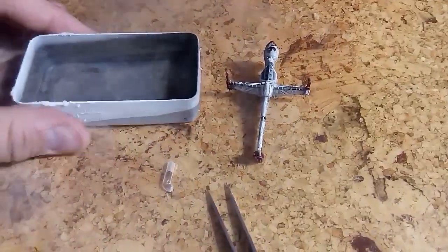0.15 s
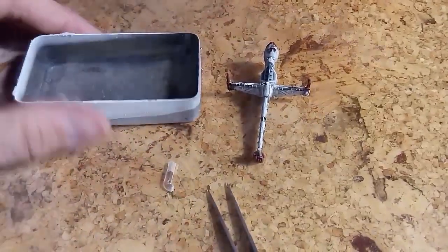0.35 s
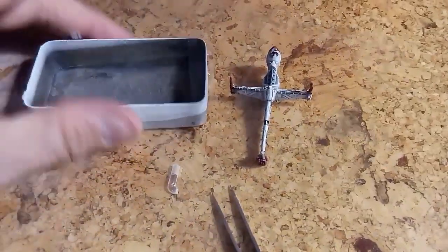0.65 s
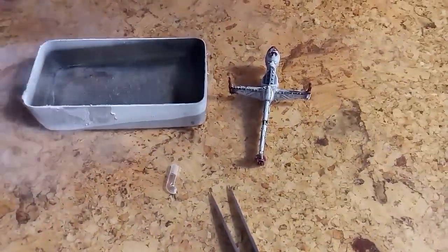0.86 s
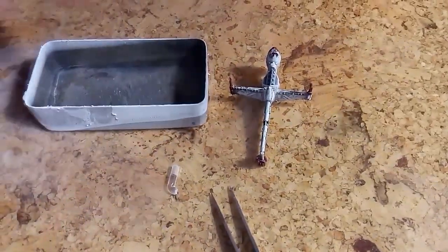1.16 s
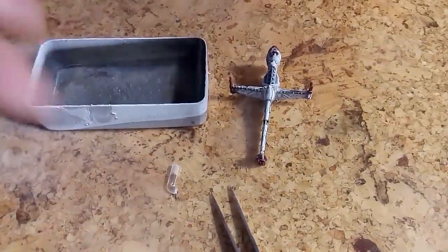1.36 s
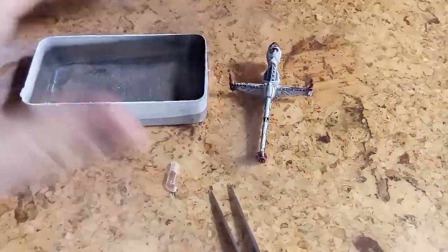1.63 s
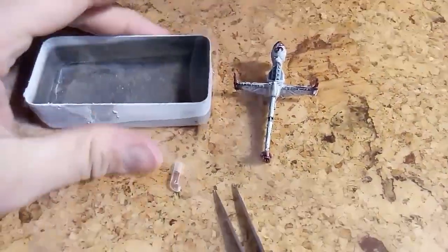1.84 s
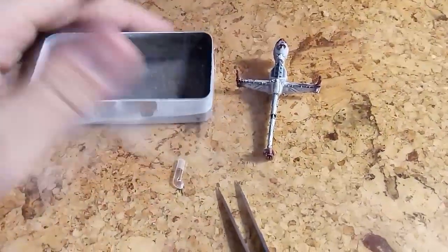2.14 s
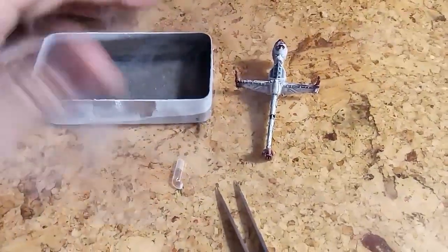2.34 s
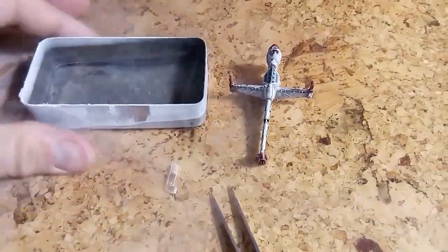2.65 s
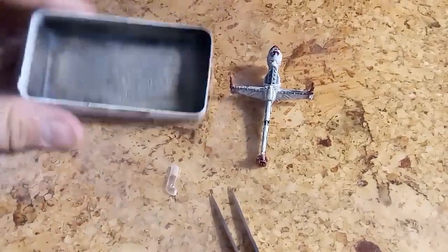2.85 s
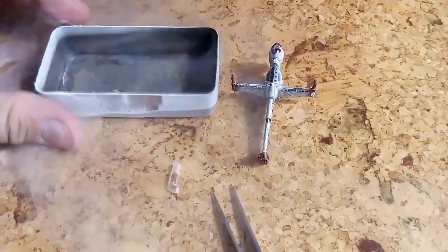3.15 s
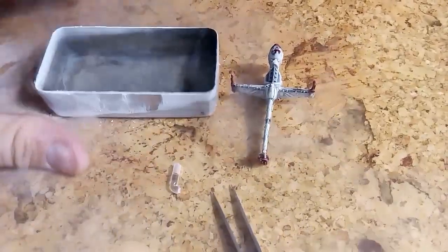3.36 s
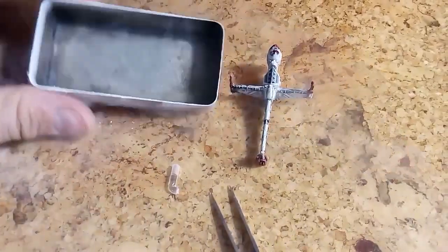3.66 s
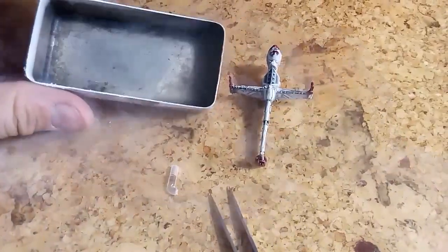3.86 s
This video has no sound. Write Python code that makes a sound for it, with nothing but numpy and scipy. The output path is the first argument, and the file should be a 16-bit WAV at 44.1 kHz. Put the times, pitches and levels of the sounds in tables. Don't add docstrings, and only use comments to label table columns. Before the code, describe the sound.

Liquid nitrogen boils with a grainy, airy fizz, strongest at the start, thinning toward 1.8 seconds, then rising brightly to the end at 4. Sharp frost ticks and short spits pepper it. The metal tray knocks the table early, at 0.8, 2.0 and 2.2, scrapes near 3.1, then drops hardest at 3.2 with a ringing clank and smaller taps. Close microphone, faint room murmur.

```python
import sys
import numpy as np
from scipy import signal
from scipy.fft import rfft, irfft
from scipy.io import wavfile

SR = 44100
rng = np.random.default_rng(int(sys.argv[2]) if len(sys.argv) > 2 else 0)


def elevation(decibels):
    levels = np.asarray(decibels, float)
    return 10 ** (levels / 20)


def inscribe(sig):
    pcm = np.round(np.clip(np.atleast_2d(sig).T, -1, 1) * 32767)
    wavfile.write(sys.argv[1], SR, pcm.astype(np.int16))


N = 176400
T = np.arange(N) / SR


def rms_one(x):
    return x / np.sqrt(np.mean(x ** 2) + 1e-20)


def in_time(rows):
    s, *columns = np.transpose(rows)
    return [np.interp(T, s, column) for column in columns]


def colour(x, points):
    hz, db = np.transpose(points)
    bins_hz = np.fft.rfftfreq(N, 1 / SR) + 1
    gain_db = np.interp(np.log(bins_hz), np.log(hz), db)
    return irfft(rfft(x) * elevation(gain_db), N)


def band(x, low_hz, high_hz):
    return signal.sosfilt(signal.butter(2, [low_hz, high_hz], "band", fs=SR, output="sos"), x)


def drift(rate_hz):
    r = np.exp(-80 * np.pi * rate_hz / SR)
    noise = rng.standard_normal(N // 40 + 2002)
    slow = signal.lfilter([1], [1, -2 * r, r * r], noise)[2000:]
    return np.interp(np.arange(N) / 40, np.arange(len(slow)), rms_one(slow))


def ring(x, hz, t60_s):
    r, w = elevation(-60 / (t60_s * SR)), 2 * np.pi * hz / SR
    return signal.lfilter([0, np.sin(w)], [1, -2 * r * np.cos(w), r * r], x + 1e-18)


def patchy(x, patchy_db, edges_hz):
    out, sign = 0, 1
    for low_hz, high_hz in zip(edges_hz, edges_hz[1:]):
        flicker_db = patchy_db * (drift(0.88) + 1.1 * drift(13.4))
        out = out + sign * elevation(flicker_db) * band(x, low_hz, high_hz)
        sign = -sign
    return out


def decay(s, db, t60_s, cut_s, rise_s):
    t = T - s
    rise = np.clip(t / rise_s, 0, 1)
    cut = np.clip((cut_s - t) / .035 + 1, 0, 1)
    return elevation(db - 60 * np.maximum(t, 0) / t60_s) * rise * cut


def swell(s, length_s, lean=1):
    return np.sin(np.pi * np.clip((T - s) / length_s, 0, 1) ** lean) ** .8


def fizz_source(extra_db):
    grains_per_s, grain_db, spread_db = 3000, 3, 3
    sizes = elevation(spread_db * np.minimum(rng.exponential(1, N), 5)) * rng.choice([-1, 1], N)
    born = rng.random(N) < grains_per_s * elevation(3 * drift(20)) / SR
    return rng.standard_normal(N) + elevation(grain_db + extra_db) * rms_one(sizes * born)


def whistles(x):
    pitches_hz = np.geomspace(1200, 7000, 26) * rng.uniform(.97, 1.03, 26)
    sung = sum(elevation(5.5 * drift(9.4)) * ring(x, hz, t60_s=.04) for hz in pitches_hz)
    return elevation(-8) * np.std(x) * rms_one(sung)


# time_s, fizz_level_db, lower_swell_db, hollow_db, sizzle_db
BOIL_VIGOUR = [(0.0, -41, -2.5, -3, 8), (.23, -46.5, 3, -2, 2.5), (.66, -47, 2, -1, 1),
               (.85, -49, 3.5, -6, -0.5), (1.17, -51, -0.5, -5, 1), (1.5, -51.5, 1.5, -9, 2),
               (1.77, -54.5, -1, -11, 0), (1.92, -51.5, -8, -4, 2), (2.05, -48, 1, -1, 2.5),
               (2.3, -50, 2, -6.5, 0.5), (2.6, -48.5, 2.5, -3, 1.5), (2.87, -49, 5, -2, 2.5),
               (3.1, -46, 1.5, -1.5, 4), (3.4, -43.5, -0.5, -4.5, 2), (3.6, -42, 1, -5.5, 3),
               (3.8, -39, -7, -2.5, 5), (4.0, -38, -18, -7, 6.5)]
# freq_hz, level_per_hz_db
FIZZ_COLOUR = [(500, -46), (900, -68), (1300, -7.5), (1800, -13), (4100, -4.5), (6500, 0.5), (9000, -5),
               (16000, -16)]


def boil():
    level_db, lower_db, hollow_db, sizzle_db = in_time(BOIL_VIGOUR)
    x = colour(fizz_source(extra_db=-6.5), FIZZ_COLOUR)
    low = patchy(x, 2.5, np.geomspace(500, 3200, 11))
    mid = patchy(x, 2, [3200, 3800, 4500])
    high = patchy(x, 1.8, np.geomspace(4500, 8000, 6))
    high = high - elevation(sizzle_db) * patchy(x, 1.8, np.geomspace(8000, 19000, 5))
    fizz = high + elevation(hollow_db) * mid + elevation(lower_db) * low + whistles(x)
    return elevation(level_db + 1.0 * drift(10.0)) * fizz / np.std(high)


# freq_hz, level_per_hz_db
AIR_COLOUR = [(12, -39), (24, -4), (181, 3), (572, -9), (775, -3), (1110, -12.5), (2000, -11.5), (2170, -1),
              (2500, -22.5), (3250, -43), (5500, -120)]
# time_s, level_db
AIR_LEVEL = [(0.0, -58), (1.57, -64), (4.0, -60.5)]


def room_tone():
    level_db, = in_time(AIR_LEVEL)
    x = patchy(colour(rng.standard_normal(N), AIR_COLOUR), 2.5, np.geomspace(15, 4000, 14))
    return elevation(level_db) * x / np.std(band(x, 37, 178))


def sung_noise(rows):
    noise, out = rng.standard_normal(N), 0
    for s, length_s, hz, width_hz, db in rows:
        out = out + swell(s, length_s) * elevation(db) * rms_one(ring(noise, hz, 2.2 / width_hz))
    return out


# start_s, length_s, pitch_hz, width_hz, level_db
DRONES = [(-.1, .57, 128, 6, -53), (1.68, .38, 2200, 50, -63), (1.85, .36, 700, 30, -66),
          (2.4, 1.7, 195, 10, -64), (1.836, .018, 3700, 100, -50), (2.165, .03, 3700, 150, -52),
          (3.78, .24, 68, 25, -60), (1.425, .17, 323, 25, -61), (2.36, .4, 335, 20, -56),
          (2.34, .14, 450, 200, -57), (.68, .07, 4400, 150, -55)]


def drones():
    return sung_noise(DRONES)


# start_s, length_s, level_db, brightness_db, body_db
SPITS = [
    (0.1306, 0.039, -31, -23, -5.5),
    (0.686, 0.1, -44.5, -5, -10),
    (1.11, 0.069, -52.5, 15.5, -20),
    (1.924, 0.18, -43, -21, -10.5),
    (1.427, .015, -37, 9, -42),
    (1.44, .018, -42.5, 5, -35),
    (3.5, .015, -41, -3, -13),
    (2.163, 0.05, -36, -18, -13),
    (2.913, 0.15, -39.5, -2, -11),
    (3.213, 0.17, -32.5, -26, -9),
]


def spits():
    x = fizz_source(extra_db=4.5)
    core, top = rms_one(band(x, 2400, 10100)), rms_one(band(x, 6770, 11900))
    core = band(band(core, 3800, 12000), 3300, 14000)
    body = rms_one(band(x, 1100, 3500))
    out = 0
    for s, length_s, db, bright_db, body_db in SPITS:
        gust = core + elevation(body_db) * body + elevation(bright_db) * top
        out = out + swell(s, length_s, lean=0.73) * elevation(db) * gust
    return out


# start_s, thump_db, clang_db, crack_db, tail_cut_s
KNOCKS = [(.14, -37, -34.5, -30.5, 0.039), (.428, -41.5, -41, -43, 0.067), (.454, -40, -59, -68, 0.051),
          (.53, -38.5, -60, -58, 0.17), (0.789, -28.5, -33, -35, 0.29), (1.691, -39.5, -45.5, -67, 0.022),
          (1.977, -35, -42, -32, 0.048), (2.185, -21.5, -25, -30.5, 0.18), (2.781, -37, -51, -44, 0.035),
          (3.2092, -52, -44, -40, .004), (3.2133, -18, -14, -9, .38), (3.246, -29, -34, -45, .05),
          (3.438, -41, -52, -57, 0.024), (.881, -40, -55, -60, 0.045), (.969, -48, -51, -60, .05),
          (3.381, -52, -43, -52, 0.12), (3.498, -37.5, -59, -52, 0.012), (3.555, -41, -45.5, -46, 0.045)]
# start_s, length_s, thump_db, clang_db
SLIDES = [
    (2.005, 0.066, -52.5, -58),
    (3.2, 0.034, -59, -48),
    (2.956, 0.027, -52, -44),
    (3.078, 0.1, -49.5, -51),
    (3.681, 0.1, -68, -54),
    (3.753, 0.077, -57.5, -61),
    (3.225, 0.062, -40, -36.5),
    (0.66, .12, -53.5, -62.5),
]


def struck_body(modes, t60_s, rattle_db, broad_db, low_hz, high_hz, rise_s, axis):
    feed, push = 0, 0
    for knock in KNOCKS:
        s, db, cut_s = knock[0], knock[axis], knock[4]
        feed = feed + decay(s, db + rattle_db, t60_s, cut_s, rise_s)
        push = push + decay(s, db - 3.5, 0.014, cut_s, .5 * rise_s)
    slides = sum(decay(k[0], k[axis + 1], 1.2, k[1], .004) for k in SLIDES)
    feed = feed + slides
    noise = rng.standard_normal(N) * elevation(3.9 * drift(65))
    out = (elevation(broad_db) * (feed - 0.39 * slides) + push) * rms_one(band(noise, low_hz, high_hz))
    at = [int(k[0] * SR) for k in KNOCKS]
    for hz, db, mode_t60_s in modes:
        clicks = np.zeros(N)
        clicks[at] = elevation(np.array(KNOCKS)[:, axis] + rng.normal(0, 1.3, len(at)) - 8.5)
        phase = 2 * np.pi * hz * T + 0.5 / mode_t60_s * drift(16.1)
        kept = elevation(3.5 * drift(18.0)) * np.sin(phase)
        out += elevation(db) * (ring(clicks, hz, 0.34 * mode_t60_s) + feed * kept)
    return out


# pitch_hz, level_db, t60_s
THUMP_MODES = [(108, -11, .4), (205, -12, .25), (262, -6, .35), (323, 1, .6), (375, -10, .2),
               (435, -8, .25), (608, -16, .25), (773, -16, .3)]


def thump():
    return struck_body(THUMP_MODES, t60_s=0.76, rattle_db=-9, broad_db=-2.5,
                       low_hz=161.5, high_hz=552, rise_s=0.0072, axis=1)


# pitch_hz, level_db, t60_s
CLANG_MODES = [(1040, -12, .15), (1170, -8, .2), (1300, -11, .15), (1367, 0, .5), (1443, -12, .3),
               (1518, -9, .2), (1828, -6, .3), (2005, -8, .2), (2300, -12, .1)]


def clang():
    return struck_body(CLANG_MODES, t60_s=0.53, rattle_db=-18.5, broad_db=0.5,
                       low_hz=550, high_hz=2680, rise_s=0.00076, axis=2)


def cracks():
    edge = 0
    for s, _, _, db, cut_s in KNOCKS:
        softer = elevation(-.7 * (db + 8))
        edge = edge + decay(s, db + 3.0, 0.017 * softer ** 0.26, cut_s, 0.00044 * softer)
        edge = edge + decay(s, db - 21, 0.35, cut_s, 0.0012)
    return edge * rms_one(band(rng.standard_normal(N), 960, 8900))


# start_s, peak_db, pitch_hz, lower_ring_db
TICKS = [(0.2614, -37, 6480, -8), (0.2947, -32, 5630, -18), (0.348, -33, 6400, -21), (0.38, -36, 6500, -16),
         (0.4274, -23, 5360, -10.5), (0.4594, -34, 6020, -18), (0.5057, -25.5, 6000, -11),
         (0.5585, -33, 5110, -13), (0.603, -30, 5500, -11), (0.7895, -27.5, 5630, -20),
         (0.835, -29.5, 5370, -24), (0.9038, -36, 6180, -17), (0.9243, -32.5, 5520, -29),
         (0.9443, -38, 6060, -20), (1.0258, -33, 5270, -18), (1.053, -38, 6230, -12),
         (1.129, -32, 6340, -25), (1.1654, -34.5, 6160, -23), (1.242, -39, 6100, -24),
         (1.3733, -43, 6640, -20), (1.4007, -35.5, 6130, -20), (1.4344, -28, 5760, -31),
         (1.498, -38, 4740, -22), (1.583, -40, 6100, -17), (1.908, -31.5, 5700, -32),
         (1.9274, -25.5, 6300, -26), (1.9754, -32, 5180, -26), (2.0088, -29, 6430, -18),
         (2.1026, -31, 6320, -21), (2.1876, -17, 6500, -22), (2.2657, -35, 6580, -14),
         (2.3077, -40, 5420, -16), (2.453, -32.5, 6180, -18), (2.6584, -36, 6100, -16),
         (2.9204, -37, 5980, -15), (2.945, -30, 6100, -17), (3.4471, -28, 5950, -14),
         (3.672, -35, 6260, -24), (3.8425, -26.5, 6760, -17), (3.9724, -23.5, 6080, -22)]


def ticks():
    t60_s, trim_db, lag_s, lower_hz = .007, -2, .001, 2900
    t = np.arange(600) / SR
    out = np.zeros(N)
    for s, db, hz, lower_db in TICKS:
        tone = np.sin(2 * np.pi * hz * t)
        lower = elevation(lower_db + 10.5) * np.sin(2 * np.pi * lower_hz * t)
        click = 0.9 * band(rng.standard_normal(600), 3600, 8400)
        envelope = elevation(-60 * t / t60_s) * np.minimum(t / 0.00014, 1)
        i = int((s + lag_s) * SR)
        out[i:i + 600] += elevation(db + trim_db) * envelope * (tone + lower + click)
    return out


# start_s, length_s, pitch_hz, width_hz, level_db
DRAGS = [(3.072, .05, 594, 28, -47), (3.09, 0.059, 760, 44, -52), (3.074, .07, 1180, 27, -52),
         (3.074, 0.059, 1400, 25, -48), (3.14, .055, 1400, 27, -51.5), (3.08, .12, 1850, 22, -54),
         (3.09, .1, 312, 40, -48.5), (2.9, 0.09, 1370, 36, -46), (.42, .13, 1370, 31, -55.5),
         (1.425, 0.074, 88, 40, -56), (3.1, .05, 690, 73, -54), (3.213, .085, 1367, 15, -33),
         (1.023, .16, 297, 110, -54.5), (3.73, 0.097, 630, 150, -58)]


def drags():
    return sung_noise(DRAGS)


def scene():
    gas = boil() + spits() + ticks()
    tray = thump() + clang() + cracks() + drags()
    return (gas + tray + room_tone() + drones())[None]


def limiter_duck():
    start_s, length_s, depth_db, ramp_s = 3.2005, 0.0076, -15, 0.0018
    inside_s = np.minimum(T - start_s, start_s + length_s - T)
    return elevation(depth_db * np.clip(inside_s / ramp_s, 0, 1))


# freq_hz, level_per_hz_db
MICROPHONE_TOP = [(55, -10), (95, -5.5), (7000, 1), (7750, -14), (9000, -25.5), (13500, -33.5), (15300, -9),
                  (15700, -8), (15880, -40)]


def microphone_colour(x):
    x = colour(x, MICROPHONE_TOP)
    return signal.sosfilt(signal.cheby2(12, 60, 16100, fs=SR, output="sos"), x)


def top_cut(x):
    return signal.sosfilt(signal.butter(12, 16910, fs=SR, output="sos"), x)


def record(dry):
    held = dry[0] / (1 + (dry[0] / .95) ** 6) ** (1 / 6)
    hiss = elevation(-56) * rng.standard_normal(N)
    mix = microphone_colour((held + hiss) * limiter_duck())
    return top_cut(mix[None])


dry = scene()
out = record(dry)
inscribe(out)
```